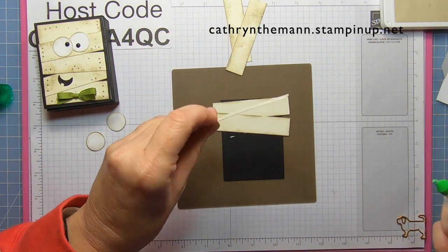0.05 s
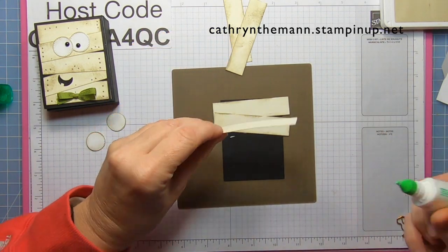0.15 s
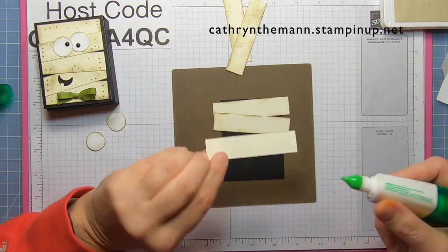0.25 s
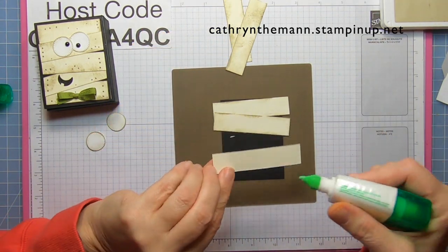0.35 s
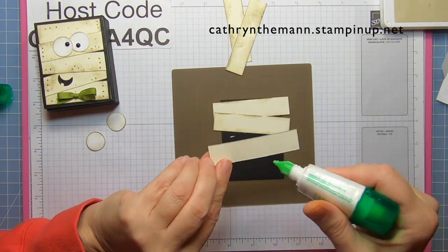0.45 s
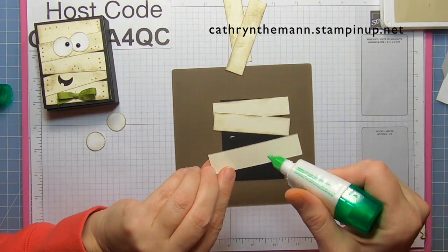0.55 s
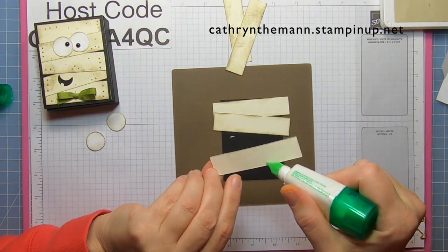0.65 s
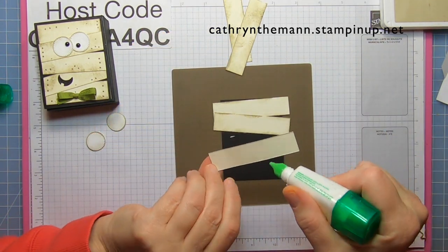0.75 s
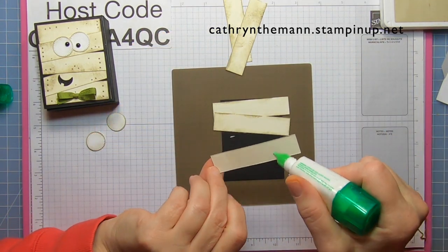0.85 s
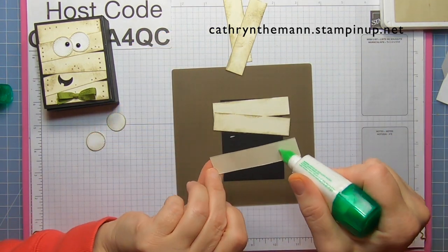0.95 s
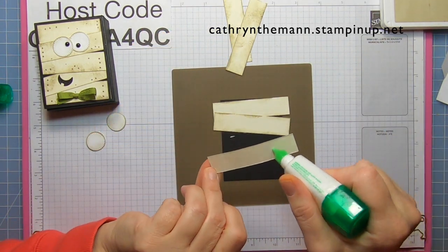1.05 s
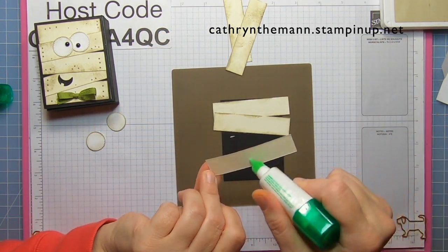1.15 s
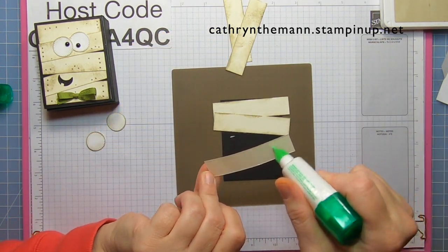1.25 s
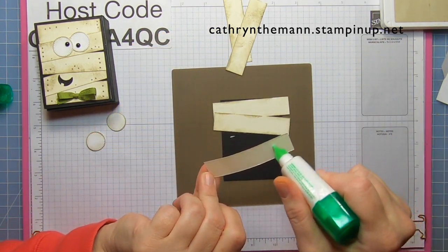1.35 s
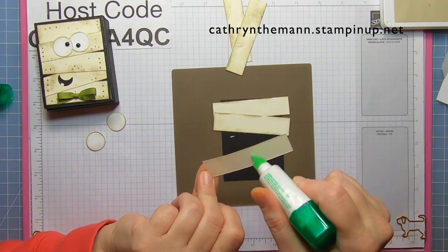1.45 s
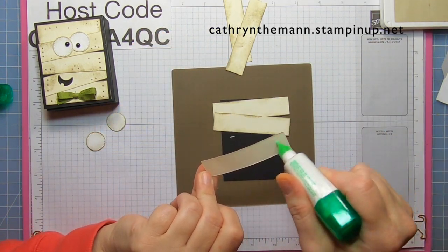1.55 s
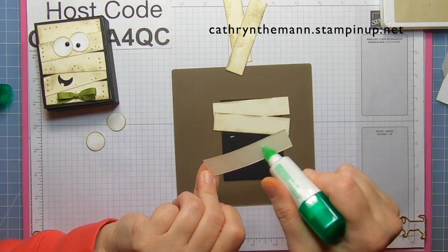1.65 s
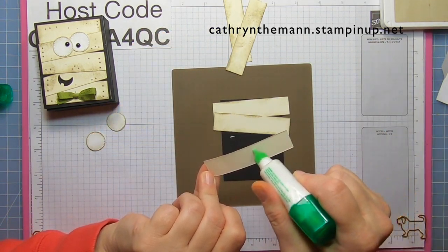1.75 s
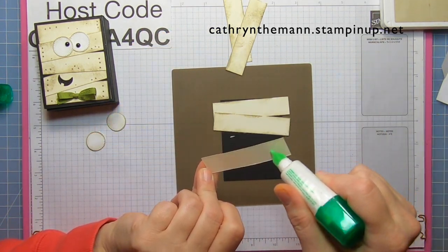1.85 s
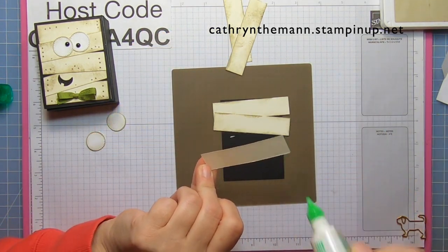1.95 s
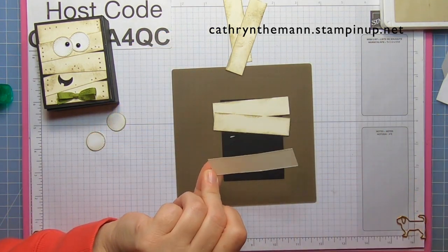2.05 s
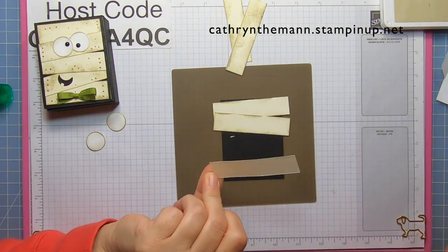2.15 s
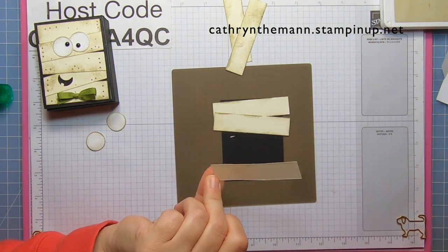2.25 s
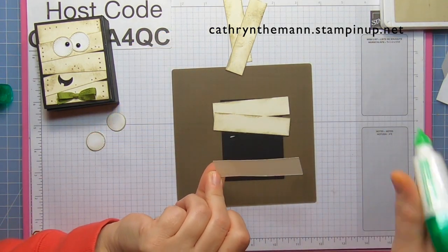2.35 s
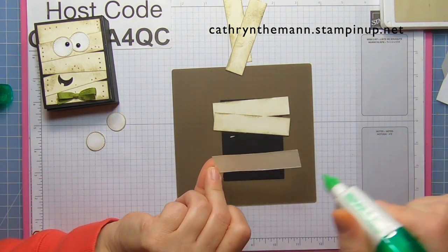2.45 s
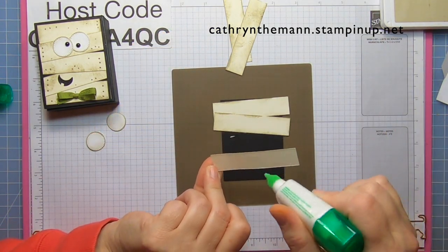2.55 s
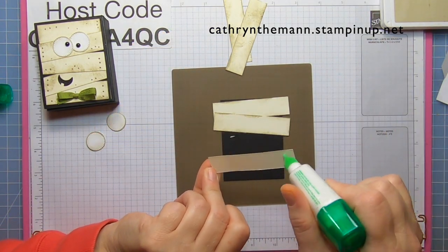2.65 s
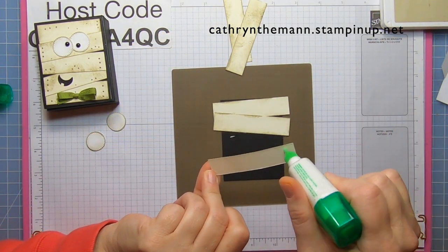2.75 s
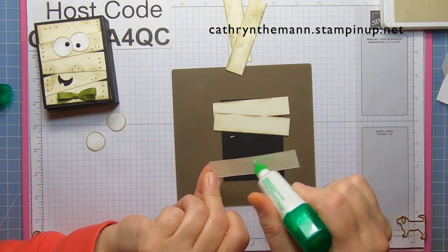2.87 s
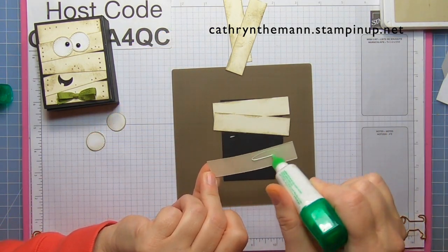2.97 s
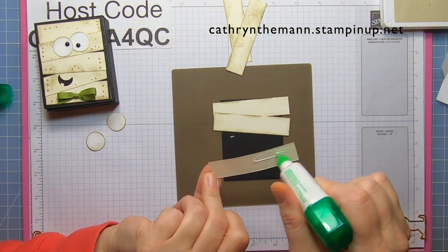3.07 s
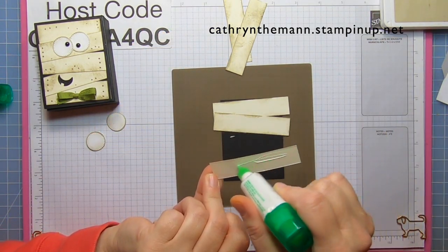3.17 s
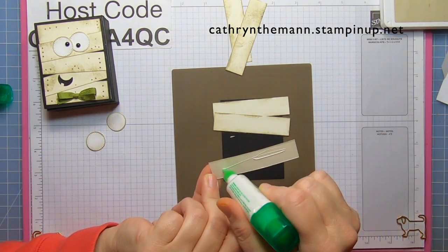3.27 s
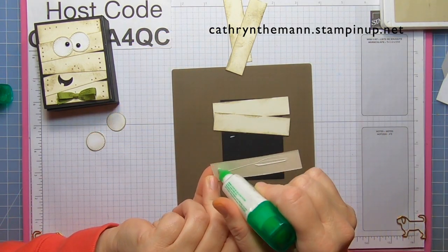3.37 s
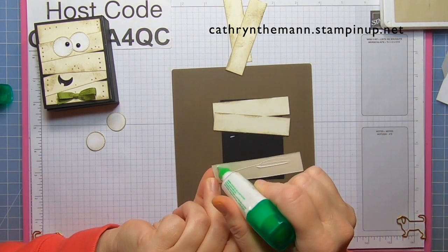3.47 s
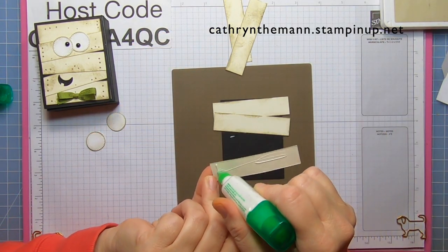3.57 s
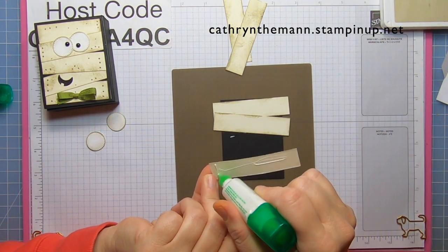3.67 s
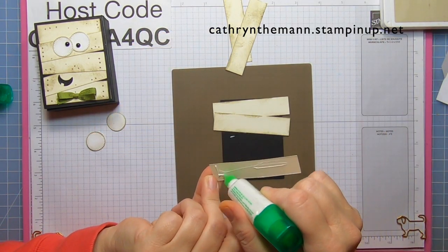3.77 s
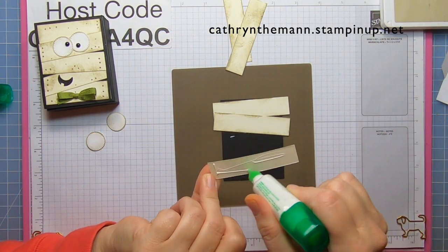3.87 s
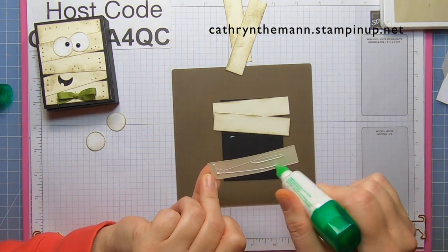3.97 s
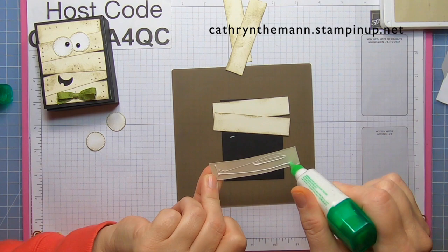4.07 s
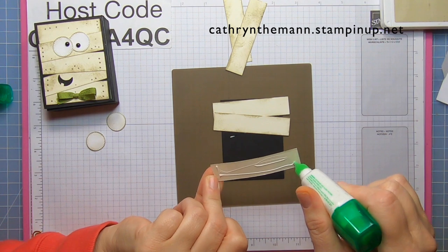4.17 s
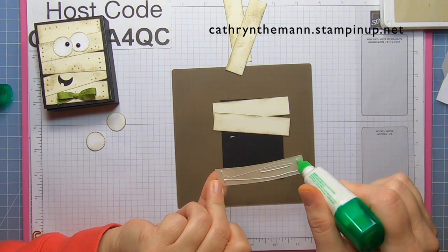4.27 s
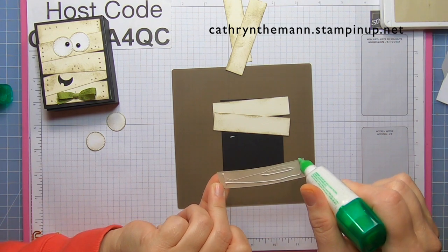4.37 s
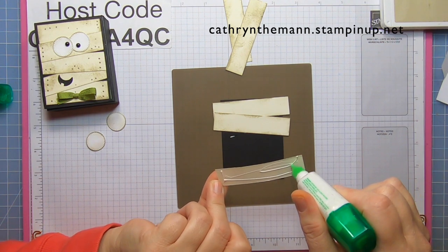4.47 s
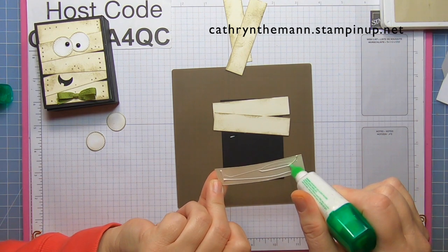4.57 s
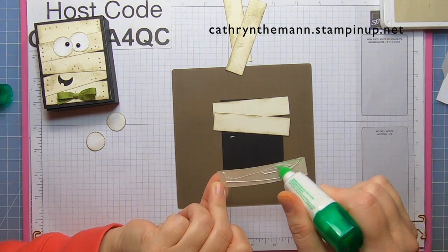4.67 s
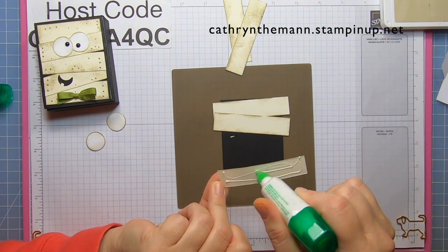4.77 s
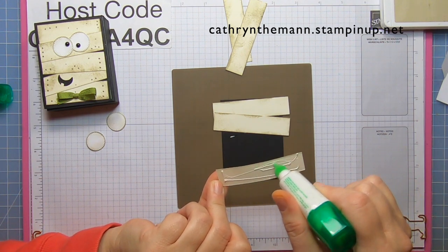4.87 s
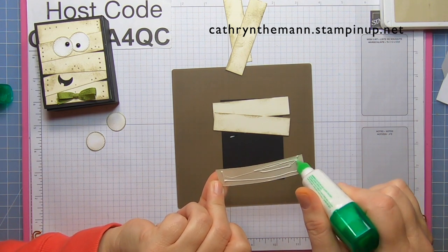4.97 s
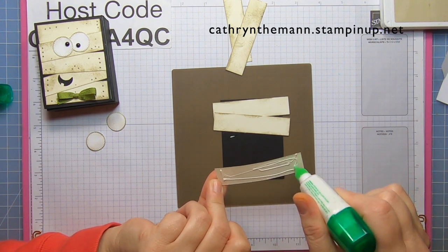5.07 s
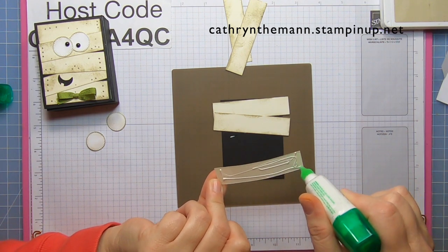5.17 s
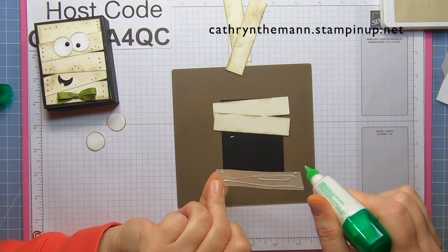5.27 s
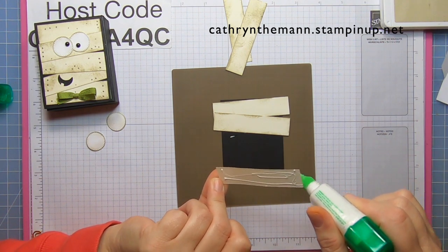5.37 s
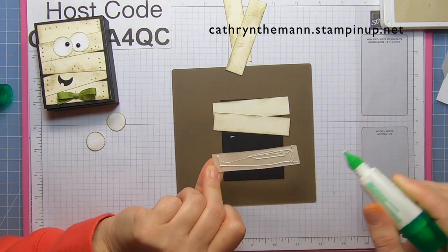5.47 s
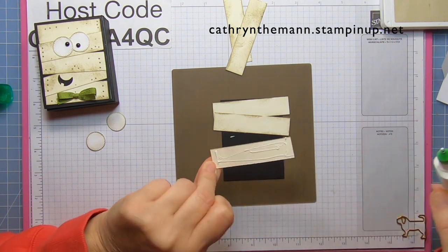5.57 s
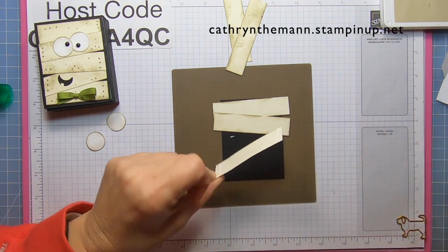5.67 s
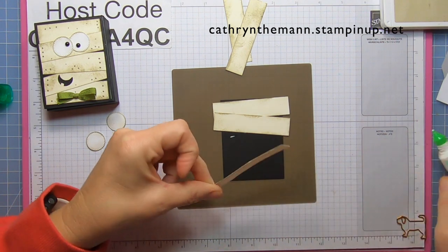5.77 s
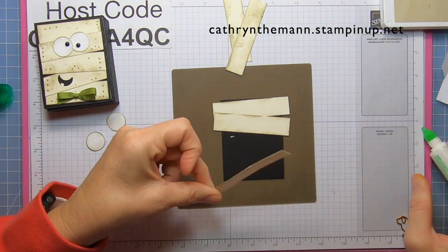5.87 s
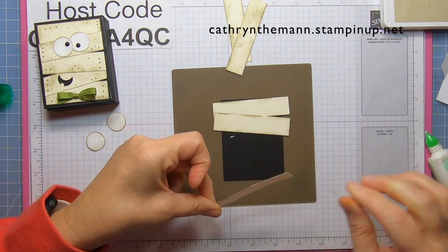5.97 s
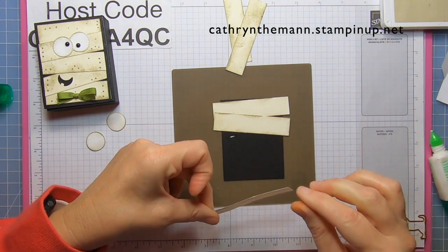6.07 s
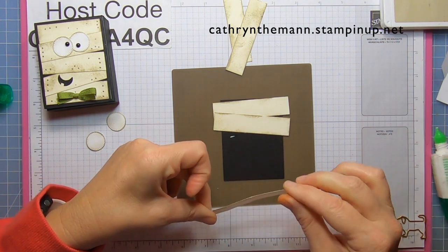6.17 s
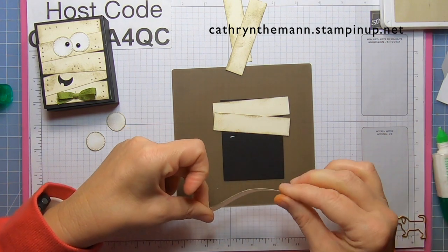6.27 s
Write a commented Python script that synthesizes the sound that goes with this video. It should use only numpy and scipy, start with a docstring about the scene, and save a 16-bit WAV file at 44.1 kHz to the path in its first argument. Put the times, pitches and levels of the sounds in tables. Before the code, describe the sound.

Glue bottle tip scrapes a thin card strip in short hissy strokes, the strip crackles, then the bottle knocks down on a table in a quiet room.

```python
"""In a small, quiet room with a low hum, a stereo microphone hangs above a craft table.
Close by, a cardstock strip is laid down and a glue bottle's tip scrapes it: patchy hiss in short strokes.
The squeezed bottle clicks and the strip flicks and crackles: sharp contacts with coloured, dying scatter.
The bottle is set down and rocks with three knocks: ringing table modes, cracks and jolted clutter.
Soft noise slides the card over the mat; a diffuse noise tail gives the room."""
import sys
import numpy as np
from scipy import signal
from scipy.fft import rfft, irfft, next_fast_len
from scipy.io import wavfile
from scipy.ndimage import map_coordinates

SR = 44100
rng = np.random.default_rng(int(sys.argv[2]) if len(sys.argv) > 2 else 0)


def to_wav(sig):
    """Store sig (one row per channel, or 1-D mono) as 16-bit WAV at the path in sys.argv[1].

    Samples outside -1..1 are clipped; the rate is SR.
    """
    pcm = np.clip(np.atleast_2d(sig), -1, 1) * 32767
    pcm = np.round(pcm).astype(np.int16)
    wavfile.write(sys.argv[1], SR, pcm.T)  # frames by channels


N = 278800  # samples

# the room's steady noise: [f/Hz, relative level/dB]
AIR_COLOUR = [(20, -6), (55, -20.5), (92, -12.5), (175, -1.5), (265, -4), (480, -15.5), (790, -4),
              (1150, -13.5), (2800, -27), (4300, -30), (6000, -30), (10000, -36.5), (11500, -41.5),
              (15000, -55)]
# correlation of left and right in that noise: [f/Hz, likeness -1..1]
AIR_LIKENESS = [(60, -0.72), (130, 0.21), (290, -0.019), (640, -0.8), (1410, -0.78), (3100, 0.23),
                (15000, -0.097)]
# correlation of left and right in the close sounds: [f/Hz, likeness -1..1]
NEAR_LIKENESS = [(100, 0.98), (400, 1), (800, 0.95), (1500, 0.083), (3000, 0.99), (7000, 0.87),
                 (13000, 0.1)]
# card and fingers sliding over the mat: [t/s, length/s, starting level/dB, level change/(dB/s)]
SLIDES = [(0, 0.27, -51.5, -11), (0.235, 0.18, -52.5, -27), (0.417, 0.13, -48, -30),
          (0.566, 0.31, -56.5, -30), (1.018, .07, -48, -30), (1.998, 0.15, -63, -7),
          (2.182, 0.18, -53.5, -80), (2.31, 0.28, -67.5, 12), (5.495, .14, -51, -90),
          (5.67, 0.12, -53, -20), (6.249, 0.16, -65, -20)]
# colour of that rustle: [f/Hz, relative level/dB]
SLIDE_COLOUR = [(300, -8), (900, -6), (1400, -3.5), (1950, 0.5), (2700, -7.5), (4400, -9.5), (5500, -8.5),
                (6600, -11), (8200, -8.5), (10000, -16), (11000, -23.5), (13000, -23), (15000, -40)]
# the strip flicks and crackles: [t/s, level/dB, tilt/(dB/octave), scatter decay/ms, left-right/dB]
SNAPS = [(.2465, -38, -10.5, 7.7, 12), (.4325, -31, -6, 3.3, -12), (.483, -36.5, -5.5, 1, -1),
         (2.032, -38.5, -3.5, 3.4, -1), (2.1972, -28.5, .5, 2.6, -5), (2.2405, -35, -1, 2.7, -6),
         (2.3202, -38.5, -7, 2.4, -8), (2.432, -47, -5, 3.4, -3), (2.47, -50, -4, 4.8, -4),
         (5.5005, -29, 9, 0.96, -3), (5.516, -33, 6, 3, 9), (5.5325, -26.5, -5.5, 4.7, -9),
         (5.5437, -27, -2, 5.8, -0.5), (5.572, -20.5, -.5, 2.1, -4), (5.5865, -26, 2.5, 1.76, -7),
         (5.6553, -34, -2, 2, -4.5), (5.694, -39, -3, 3.5, -5), (5.735, -26.5, -0.5, 6.6, -6.5),
         (5.756, -29, -4, 2.1, -3), (5.8203, -35, -1, 0.7, -5), (6.146, -50.5, -1, 2.8, -2),
         (6.246, -47.5, 0, 2, -4)]
# colour of the flicking strip before tilt: [f/Hz, relative level/dB]
SNAP_COLOUR = [(200, -46.5), (900, -10), (1500, -5.5), (2300, 1.5), (3400, 0), (4300, -2.5), (5200, 2),
               (6500, -1), (8200, 4.5), (10800, -14), (12300, -12.5), (13800, -21), (15000, -58)]
# the bottle's plastic wall clicks: [t/s, level/dB, tilt/(dB/octave), scatter decay/ms, left-right/dB]
CLICKS = [(.3993, -34.5, 9.5, 2.1, 1), (.5953, -33, 9.5, 2.6, -2.5), (1.9765, -38.5, 6, 3.8, -7),
          (2.0697, -28.5, 9, 4.1, -6.5), (2.1193, -34, 6.5, 3, -7), (2.7695, -32.5, 3.5, 9, 3)]
# colour of the bottle wall before tilt: [f/Hz, relative level/dB]
CLICK_COLOUR = [(200, -20), (900, 5.5), (1500, 2), (1900, 14.5), (2500, -4.5), (3400, -8.5), (5200, -15.5),
                (6800, -29), (8200, -21.5), (9200, -34), (12000, -49), (15000, -63)]
# hand and bottle knock on the table: [t/s, gain of the whole blow/dB, hardness (low-pass) f/Hz,
# pitch of the crack f/Hz, relative thud level/dB, relative table-top level/dB, left-right/dB]
KNOCKS = [(0.4237, -29.5, 4000, 1620, -1.5, -16, -1), (.4305, -31.5, 3520, 870, 2, -21, 3),
          (2.291, -49.5, 597, 1000, 8, -8, -5), (5.8553, -7.5, 4100, 1390, -18, -7, -4.5),
          (5.8709, -18.5, 3500, 1200, 3.5, -11, 0.5), (5.9524, -27.5, 1850, 880, 6, -3, 0),
          (5.9601, -19.5, 6200, 930, 2, -1, -3), (6.0486, -10.5, 2380, 1244, 0, -10.5, -2.5)]
# the table top under a blow, without the hand's damping: [f/Hz, relative level/dB, t60/s]
TOP_MODES = [(957, -11, 0.12), (1116, 2, 0.067), (1292, 3, 0.048), (1510, -30, 0.058), (1520, -11, 0.12),
             (1633, -6.5, 0.11), (1902, -16, 0.22), (2810, -6, 0.033), (3420, -21, .055),
             (3140, -18, 0.062)]
# the low thud under a blow, without the hand's damping: [f/Hz, relative level/dB, t60/s]
THUD_MODES = [(49.4, -7, 0.2), (79.5, -1, 0.22), (104, -8.5, 0.36), (155, 1, 0.12), (185.6, -0.5, 0.41),
              (216.6, 4.5, 0.29), (253.7, 3, 0.17), (318.3, 3, 0.17), (391.6, -9, 0.39), (467, -5.5, 0.21),
              (533, -4.5, 0.14), (640, -9.5, 0.23), (792, 10.5, 0.034)]
# colour of a crack: [f/Hz for a blow pitched at 1000 Hz, relative level/dB]
CRACK_COLOUR = [(45, -32), (190, -8), (620, -8.5), (1000, 3.5), (1450, -10.5), (2400, -6.5), (3700, -15),
                (6000, -12.5), (7500, -19.5), (11000, -26)]
# loose things jolted on the table: [f/Hz, relative level/dB]
CLUTTER_COLOUR = [(35, -52), (80, -38), (130, 5), (250, 11), (450, -1.5), (900, -2), (1400, -36),
                  (2500, -16.5), (6000, -21), (12000, -93)]
# the tip taps the card: [t/s, level/dB, tilt/(dB/octave), scatter decay/ms, left-right/dB]
TAPS = [(.65, -37.5, -8.5, 8.3, 0), (1.0203, -41, -4, 1.5, 2), (1.8835, -31.5, 1, 2.8, -.5),
        (2.73, -30.5, -1.5, 5.2, -1), (2.7688, -32.5, 3, 2.7, 0), (3.042, -28.5, 1.5, 1.1, -1),
        (3.093, -46, 3, 1.7, -5), (4.099, -45, -2, 4.4, 0), (5.369, -36.5, -5, 1.8, 2),
        (6.283, -41, -6.5, 7.9, -5)]
# strokes of the tip on the card:
# [t/s, speeding up/s, slowing down/s, hiss level/dB, card body level before a common trim/dB]
STROKES = [(1.105, 0.029, 0.094, -38.5, -53), (1.232, 0.061, 0.098, -40, -53),
           (1.382, 0.054, 0.11, -46, -65), (1.532, 0.071, 0.056, -41.5, -56),
           (1.652, 0.058, 0.093, -44, -62), (1.8, 0.078, 0.1, -47.5, -64),
           (2.815, 0.027, 0.073, -55.5, -62.5), (2.902, 0.018, 0.081, -48.5, -58),
           (2.978, 0.084, .05, -38, -56), (3.112, 0.028, 0.074, -47, -61), (3.195, 0.052, 0.053, -52, -57),
           (3.845, 0.094, 0.087, -49.5, -52.5), (3.96, 0.072, 0.13, -50.5, -64),
           (4.075, 0.028, 0.046, -62.5, -71), (4.26, 0.068, 0.078, -59.5, -59.5),
           (4.505, 0.021, 0.024, -59, -68), (4.7, 0.032, .035, -68.5, -69),
           (4.78, 0.029, 0.041, -61.5, -71), (4.922, 0.039, 0.022, -43.5, -63),
           (5.001, .008, .034, -45, -55), (5.015, 0.038, 0.073, -70, -58), (5.225, .025, 0.034, -56, -59.5),
           (5.428, .014, .018, -67, -54)]
# colour of the earlier strokes: [f/Hz, relative level/dB]
EARLY_CARD_COLOUR = [(300, -24), (1000, -2), (1800, -19), (2700, 3), (3300, 7), (4300, -5), (5400, 5),
                     (6400, -3.5), (7300, 2.5), (8500, -4), (10000, -11.5), (10800, -29), (12200, -19),
                     (15000, -46)]
# colour of the later strokes, also used for all the tip's taps: [f/Hz, relative level/dB]
LATE_CARD_COLOUR = [(300, -29), (1000, 0.5), (2500, -6.5), (3350, 8), (4300, -6), (5600, 4), (6600, -6),
                    (7200, -5), (8300, -4), (9100, -16.5), (10100, -13.5), (11100, -39), (12200, -18.5),
                    (14500, -61)]
# low resonances of the card: [f/Hz, relative level/dB]
CARD_BODY_COLOUR = [(350, -65), (600, -14), (900, 2.5), (1300, 11.5), (1900, 4), (2600, 7), (4000, -38)]
# decay of the room: [f/Hz, t60/s]
ROOM_T60 = [(100, 0.16), (300, 0.19), (1000, 0.23), (4000, 0.21), (12000, 0.2)]

AIR_DB, HUM_DB, HUM_HZ = -54, -64, 56.6
SLIDE_ATTACK_S, SLIDE_RELEASE_S = 0.0027, 0.11
HAND_DAMPING_DB_PER_S = 88  # the hand holding the bottle deadens the table's ring
LATE_FROM_S = 2.5  # strokes from here on take the later colour
HISS_LAW, BODY_LAW = 1.57, 0.59  # amplitude grows as these powers of the tip's speed
EDGE_HZ = 15400  # upper limit of the recorder
PER_MS = np.sqrt(SR / 1000)  # turns energy 1 into an rms of 1 over one millisecond


def amp(db):
    """Decibels to gain."""
    return 10 ** (np.asarray(db) / 20)


def unit(x):
    """Scales to an rms of 1."""
    return x / np.sqrt(np.mean(x ** 2) + 1e-20)


def read(points, hz):
    """Joins (f/Hz, value) points by straight lines on a log-frequency axis."""
    f, value = np.transpose(points)
    return np.interp(np.log(hz + 1), np.log(f + 1), value)


def add(mix, s, sound):
    """Mixes a sound in at s seconds, cut at the end of the mix."""
    part = mix[:, max(round(s * SR), 0):][:, :sound.shape[-1]]
    part += sound[..., :part.shape[1]]


def pan(db):
    """Left and right gains for a left-right level difference."""
    return amp([[db / 2], [-db / 2]])


def colour(x, spectrum):
    """Filters by a (f/Hz, level/dB) spectrum."""
    size = x.shape[-1]
    gain = amp(read(spectrum, np.fft.rfftfreq(size, 1 / SR)))
    return irfft(rfft(x) * gain, size)


def noise_pair(size, likeness):
    """White noise for the two microphone sides, partly alike."""
    a, b = rfft(rng.standard_normal((2, size)))
    same = np.clip(read(likeness, np.fft.rfftfreq(size, 1 / SR)), -1, 1)
    right = same * a + np.sqrt(1 - same ** 2) * b
    return irfft(np.array([a, right]), size)


def drift(rate_hz):
    """Slow random motion of rms 1."""
    hz = np.fft.rfftfreq(N, 1 / SR)[:N // 20]
    a, b = rng.standard_normal((2, len(hz)))
    lowpass = np.exp(-np.minimum(hz / rate_hz, 10) ** 2)
    return unit(irfft((a + 1j * b) * lowpass, N))


def patchy(x, depth_db, width_hz, hold_s):
    """Lets a noise swell and fade in small random patches of time and pitch, then sets its rms to 1."""
    hz, t, z = signal.stft(x, SR, nperseg=512, noverlap=384)
    shape = next_fast_len(len(hz)), next_fast_len(len(t))
    along_hz = np.fft.fftfreq(shape[0], hz[1])[:, None]
    along_s = np.fft.rfftfreq(shape[1], t[1])
    smooth = np.exp(-(np.pi * along_hz * width_hz / 2) ** 2) * np.exp(-(np.pi * along_s * hold_s) ** 2)
    patches = np.fft.irfft2(np.fft.rfft2(rng.standard_normal(shape)) * smooth, shape)
    patches = unit(patches)[:len(hz), :len(t)]
    z = z * amp(depth_db * np.clip(patches, -2, 2))
    return unit(signal.istft(z, SR, nperseg=512, noverlap=384)[1][:, :N])


def air():
    """Gently wavering ventilation noise, and a low hum that wanders in phase and swells and sags."""
    waver, wander = .2, .8  # level as a fraction, phase in radians
    phase = 2 * np.pi * HUM_HZ * np.arange(N) / SR + wander * drift(rate_hz=5.0)
    hum = np.sqrt(2) * np.sin(phase) * (1 + waver * drift(rate_hz=2.9))
    wash = patchy(noise_pair(N, AIR_LIKENESS), depth_db=2.0, width_hz=220, hold_s=0.031)
    return amp(HUM_DB) * hum + amp(AIR_DB) * unit(colour(wash, AIR_COLOUR))


def friction(spectrum, grain_db, grain_hz):
    """Fibres catch and let go: hiss that comes in tiny clumps."""
    clumps = noise_pair(N, NEAR_LIKENESS) * amp(grain_db * drift(grain_hz))
    return unit(colour(clumps, spectrum))


def sliding():
    """Soft, fluttering rustle of the strip and fingers on the mat; each slide fades to a stop."""
    rustle = friction(SLIDE_COLOUR, grain_db=2.5, grain_hz=453)
    rustle = patchy(rustle, depth_db=-1.0, width_hz=970, hold_s=0.0064)
    effort = np.zeros((1, N))
    for s, length, db, change in SLIDES:
        t = np.arange(0, length, 1 / SR)
        moving = np.clip(np.minimum(t / SLIDE_ATTACK_S, (length - t) / SLIDE_RELEASE_S), 0, 1)
        add(effort, s, moving * amp(db + change * t))
    return rustle * effort * pan(-1.8)


def impulse(spectrum, tilt_db=0, size=2048):
    """A causal, minimum-phase click of energy 1 with the given colour; the tilt acts above 500 Hz."""
    hz = abs(np.fft.fftfreq(size, 1 / SR))
    log_gain = np.log(amp(read(spectrum, hz) + tilt_db * np.log2(np.maximum(hz, 500))))
    click = np.fft.ifft(np.exp(np.conj(signal.hilbert(log_gain)))).real[:size // 2]
    return click / np.linalg.norm(click)


def contact(decay_ms, scatter_db, size=4096):
    """A sharp contact with quickly dying scatter; rms 1 over one millisecond on the left."""
    fade = np.exp(-np.arange(size) / SR * 1000 / max(decay_ms, .2))
    scatter = noise_pair(size, NEAR_LIKENESS) * fade
    push = amp(scatter_db) * scatter / np.linalg.norm(scatter[0])
    push[:, 0] += 1
    return push / np.linalg.norm(push[0]) * PER_MS


def ticks(rows, spectrum, scatter_db):
    """Small contacts through a given colour; before panning, level is rms over one ms."""
    out = np.zeros((2, N))
    for s, db, tilt_db, decay_ms, side_db in rows:
        click = impulse(spectrum, tilt_db)[None]
        tick = signal.fftconvolve(contact(decay_ms, scatter_db), click, axes=1)
        tick *= PER_MS / np.linalg.norm(tick, axis=1, keepdims=True)
        add(out, s, amp(db) * pan(side_db) * tick)
    return out


def snapping():
    """The strip flicks and crackles: mostly scatter after each contact."""
    return ticks(SNAPS, SNAP_COLOUR, scatter_db=18.5)


def clicking():
    """The squeezed bottle's wall clicks: contact and scatter of nearly equal energy."""
    return ticks(CLICKS, CLICK_COLOUR, scatter_db=-1)


def ring(modes, vary_db, spread, size=8192):
    """Dying sines, weighted anew by each blow and out of step left to right; mean energy 1 a side."""
    t = np.arange(size) / SR
    weight, lag = rng.standard_normal((2, len(modes)))
    sides = np.array([[.5], [-.5]])
    x = np.zeros((2, size))
    for k, (hz, db, t60) in enumerate(modes):
        level = (-1) ** k * amp(db + vary_db * weight[k] - 60 * t / t60)
        x += level * np.sin(2 * np.pi * hz * t + sides * spread * lag[k])
    x *= np.minimum(t * 2000, 1)  # half a millisecond of onset
    return x / np.linalg.norm(x) * np.sqrt(2)


def knocking():
    """Blows crack, ring the table top and jolt clutter; each one's hardness sets the treble it keeps."""
    out = np.zeros((2, N))
    for s, db, hard_hz, pitch_hz, thud_db, top_db, side_db in KNOCKS:
        top = ring(TOP_MODES, vary_db=4.5, spread=0.85)
        thud = ring(THUD_MODES, vary_db=2.0, spread=0.26)
        blow = (amp(top_db) * top + amp(thud_db) * thud) * PER_MS
        blow *= amp(-HAND_DAMPING_DB_PER_S * np.arange(blow.shape[1]) / SR)
        crack = impulse([(hz * pitch_hz / 1000, level) for hz, level in CRACK_COLOUR])[None]
        add(blow, 0, signal.fftconvolve(contact(decay_ms=6, scatter_db=-1), crack, axes=1))
        jolt = contact(decay_ms=19, scatter_db=20.0, size=8192)
        clutter = signal.fftconvolve(jolt, impulse(CLUTTER_COLOUR)[None], axes=1)
        add(blow, 0, amp(thud_db - 5) * clutter)
        lowpass = signal.butter(2, min(hard_hz, SR / 3), fs=SR)
        add(out, s, amp(db) * pan(side_db) * signal.lfilter(*lowpass, blow))
    return out


def tapping():
    """The tip taps the card: short contacts in the colour of the later strokes."""
    return ticks(TAPS, LATE_CARD_COLOUR, scatter_db=4.5)


def bend(x, ratio):
    """Shifts every frequency of a stereo sound by a changing ratio."""
    return np.array([map_coordinates(side, [np.cumsum(ratio)], mode="mirror") for side in x])


def card_rub(spectrum):
    """Clumpy scraping hiss that swells and fades in random narrow patches of pitch and time."""
    return patchy(friction(spectrum, grain_db=1.5, grain_hz=400), depth_db=6.0, width_hz=75, hold_s=0.025)


def scraping():
    """Strokes speed up and slow down; low resonances and the echo from the strip's ends glide along."""
    path_ms, travel = 1.3, .2  # mean echo delay and the fraction it moves
    glide, echo = .07, .5  # fraction the low resonances move, echo gain
    body_trim_db = -1
    early = card_rub(EARLY_CARD_COLOUR)
    late = card_rub(LATE_CARD_COLOUR)
    body = card_rub(CARD_BODY_COLOUR)
    out = np.zeros((2, N))
    for k, (s, rise_s, fall_s, hiss_db, card_db) in enumerate(STROKES):
        at = np.arange(int(s * SR), min(int((s + rise_s + fall_s) * SR), N))
        speed = np.sin(np.pi / 2 * np.interp(at / SR - s, [0, rise_s, rise_s + fall_s], [0, 1, 0]))
        place = (-1) ** k * (2 * np.cumsum(speed) / speed.sum() - 1)  # to and fro, -1 to 1
        hiss = (early if s < LATE_FROM_S else late)[:, at]
        low = bend(body[:, at], 1 - glide * place)
        rub = hiss * amp(hiss_db) * speed ** HISS_LAW
        rub = rub + low * amp(body_trim_db + card_db) * speed ** BODY_LAW
        delay = path_ms * SR / 1000 * (1 + travel * place)
        back = np.array([np.interp(at - delay, at, side) for side in rub])
        add(out, s, (rub + echo * back) / np.hypot(1, echo))
    return out * pan(-0.36)


def room(x, size=22050):
    """A short diffuse tail with a decay time set by frequency, fed by both sides in mono."""
    noise = noise_pair(size, [(200, 1.0), (700, 0.2), (8000, 0.18)])  # f/Hz, left-right likeness
    hz, t, z = signal.stft(noise, SR, nperseg=256)
    fade = amp(-60 * t / read(ROOM_T60, hz)[:, None])
    tail = signal.istft(z * fade, SR, nperseg=256)[1]
    tail *= np.clip(np.arange(tail.shape[1]) / SR / 0.006, 0, 1) ** 2  # builds up over 6 ms
    return signal.fftconvolve(x[None].mean(1), tail / np.linalg.norm(tail[0]), axes=1)[:, :N]


def scene():
    """Paper, bottle, table and tip, all close under the microphone in a small room."""
    paper = sliding() + snapping()
    bottle = clicking() + tapping()
    knocks = knocking()
    scrape = scraping()
    # how much of each source reaches the room tail
    send = amp(-15.5) * scrape + amp(-7) * paper + amp(-8.5) * bottle + amp(-14.5) * knocks
    return scrape + knocks + paper + bottle + room(send) + air()


def record(dry):
    """The recorder's band limit: a steep linear-phase low-pass."""
    lowpass = signal.firwin(511, EDGE_HZ, window=("kaiser", 9), fs=SR)
    return signal.oaconvolve(dry, lowpass[None], "same")


dry = scene()
out = record(dry)
to_wav(out)
```